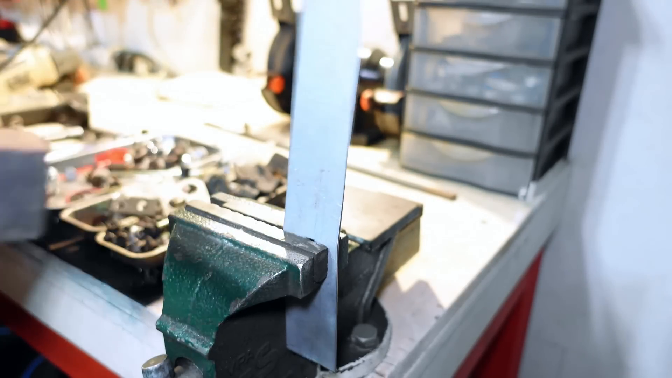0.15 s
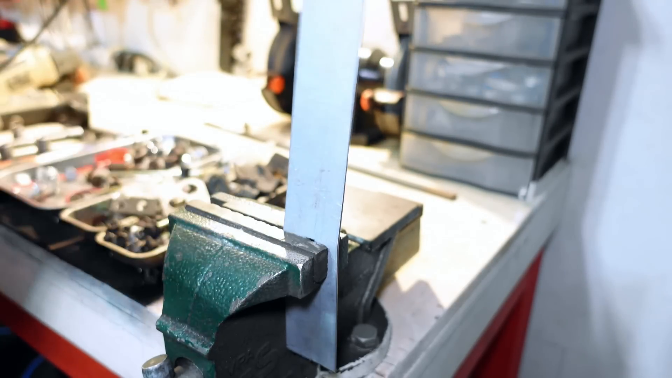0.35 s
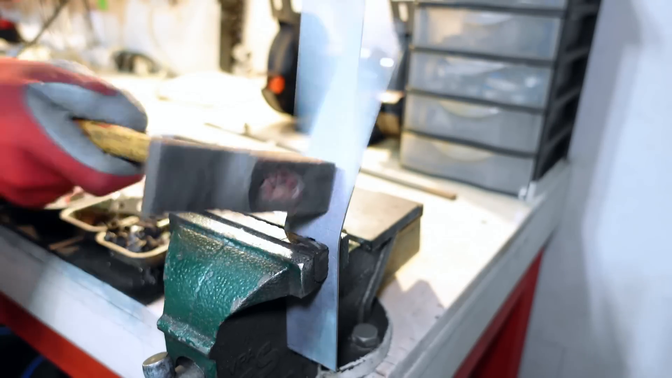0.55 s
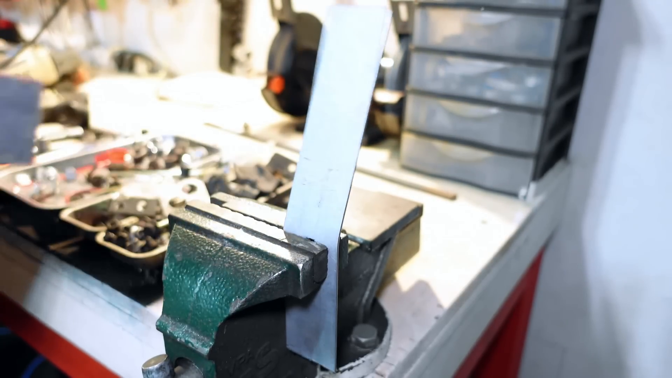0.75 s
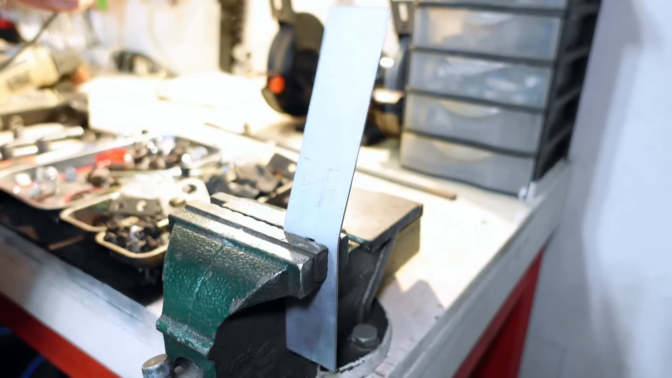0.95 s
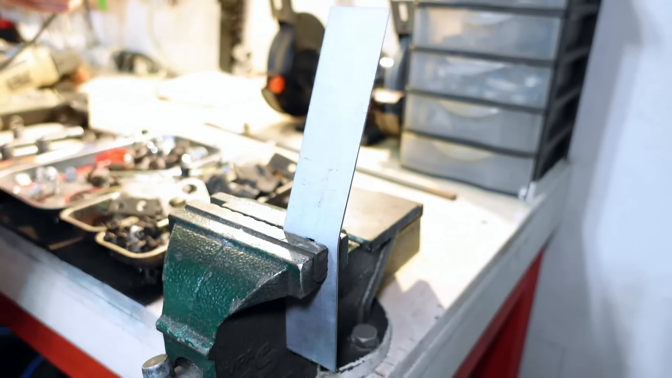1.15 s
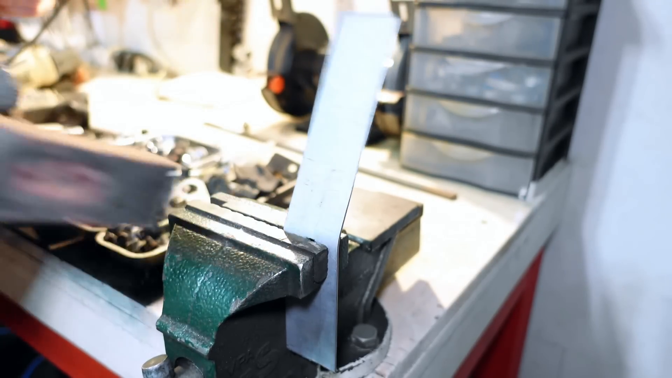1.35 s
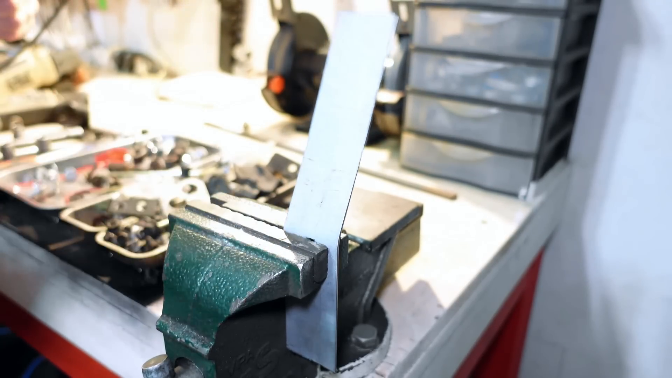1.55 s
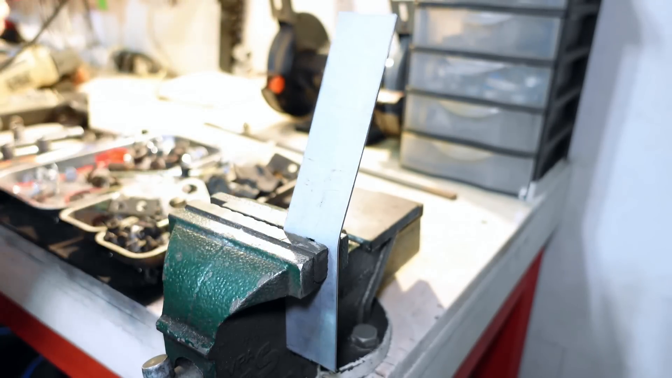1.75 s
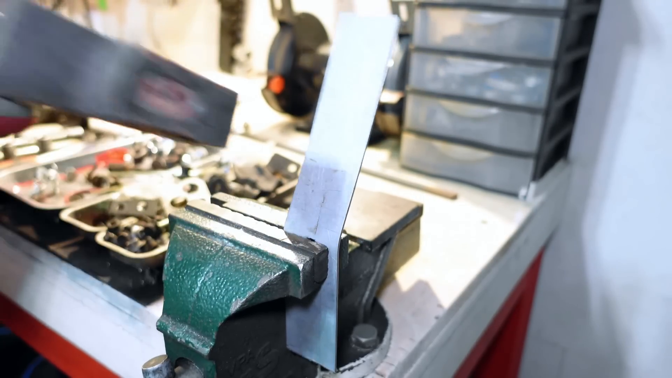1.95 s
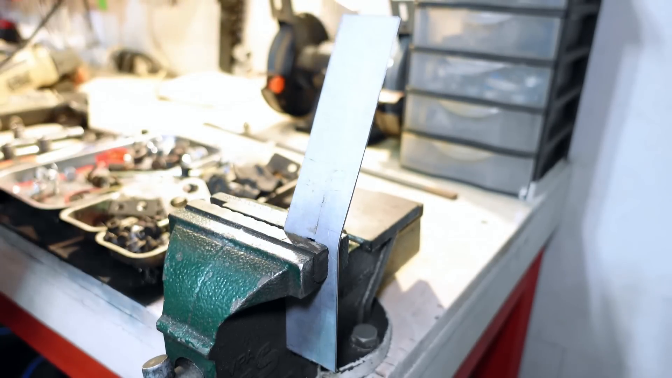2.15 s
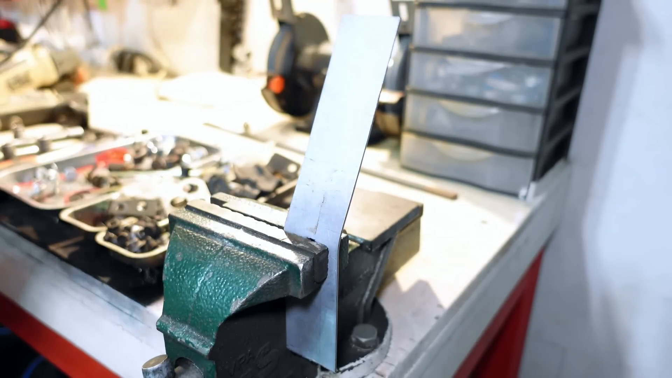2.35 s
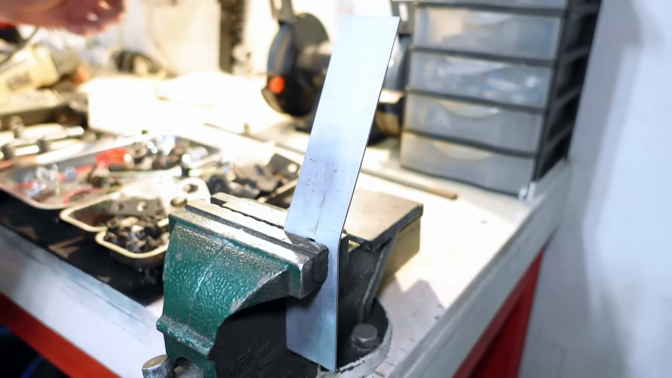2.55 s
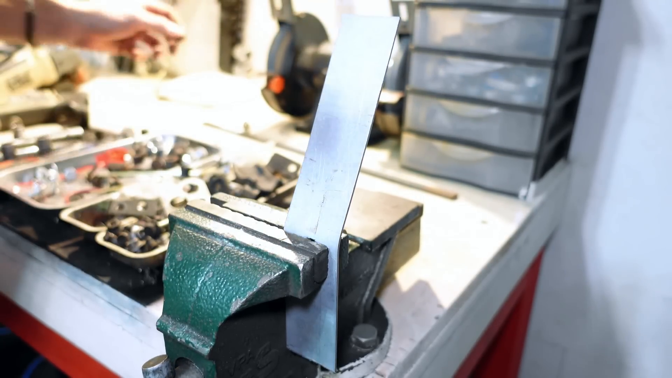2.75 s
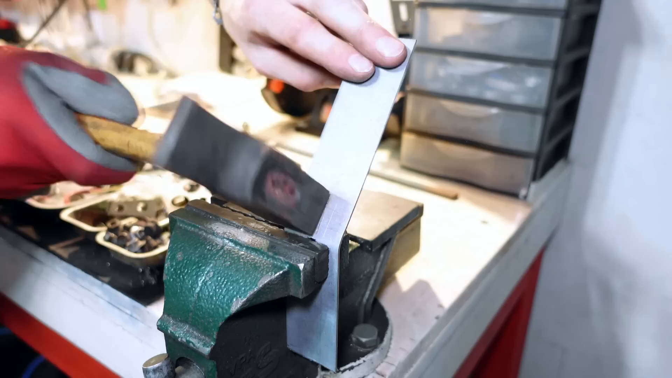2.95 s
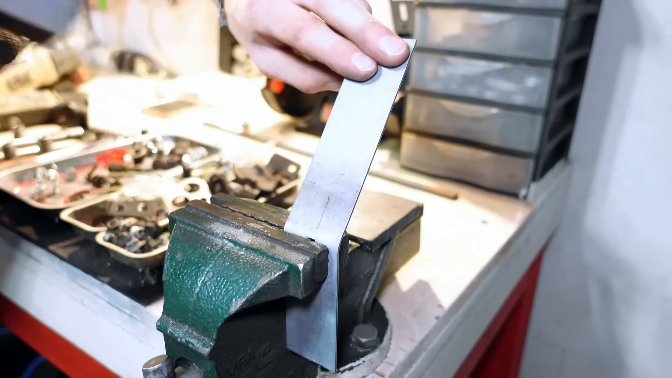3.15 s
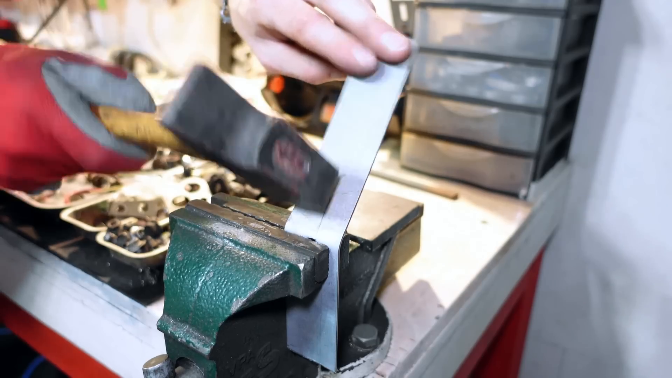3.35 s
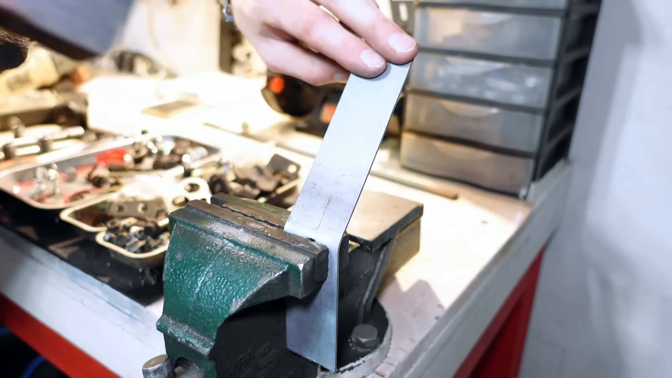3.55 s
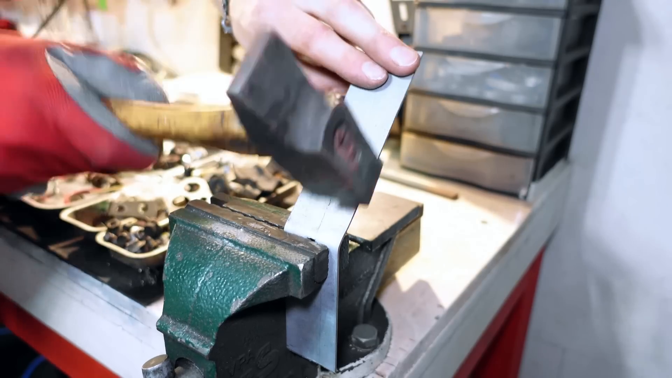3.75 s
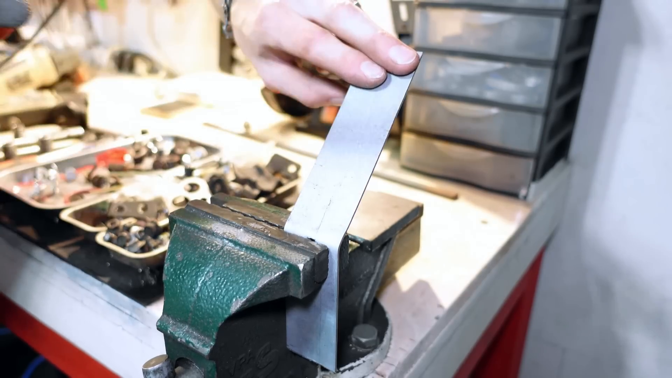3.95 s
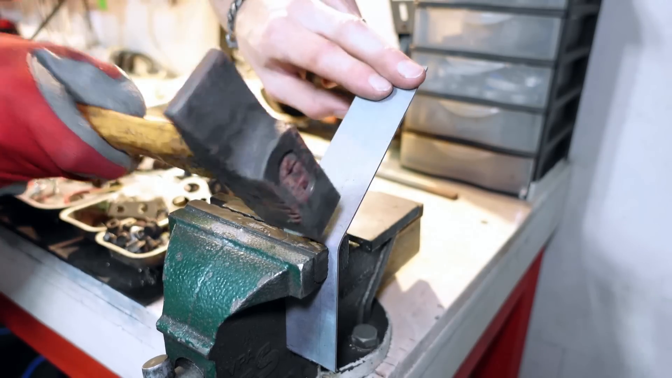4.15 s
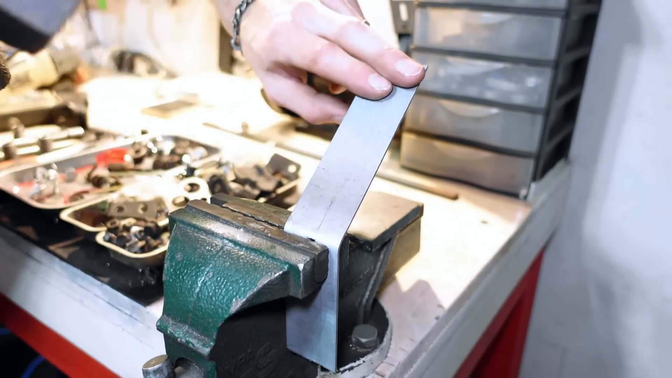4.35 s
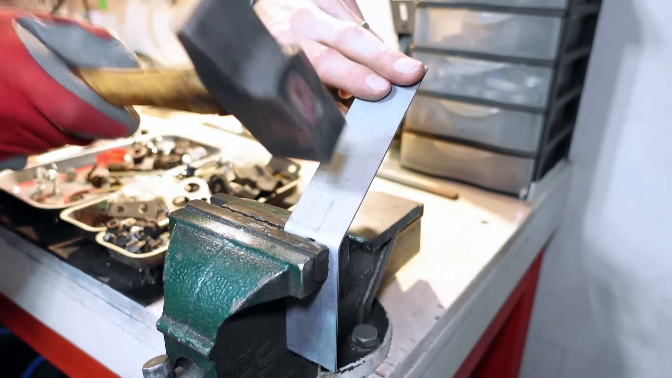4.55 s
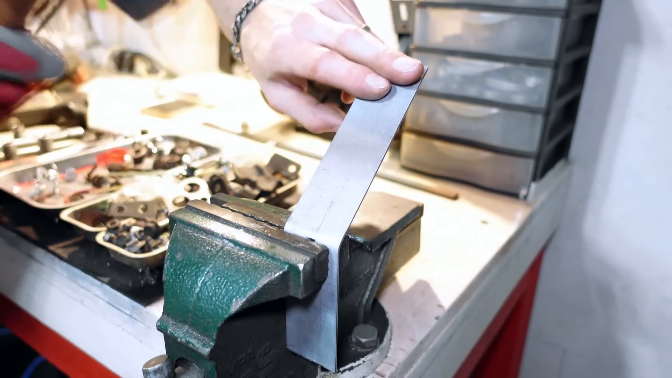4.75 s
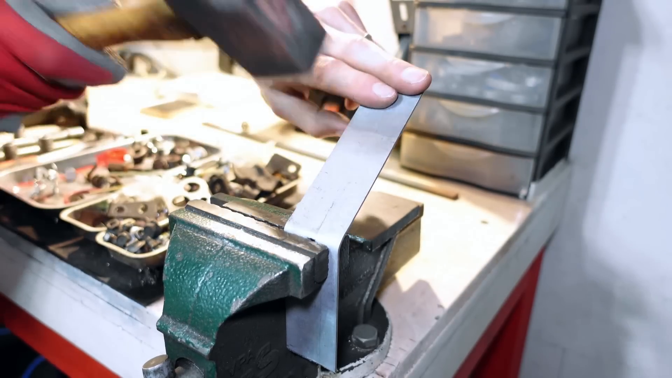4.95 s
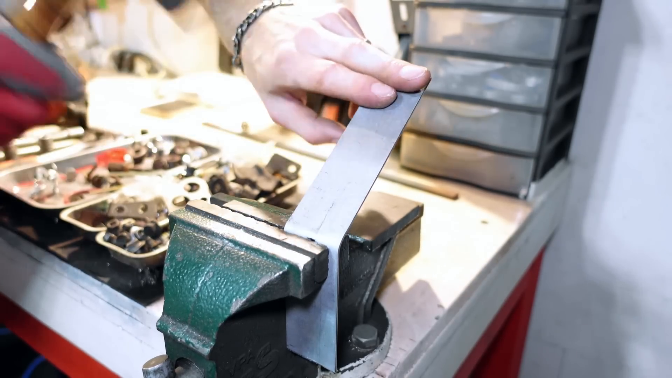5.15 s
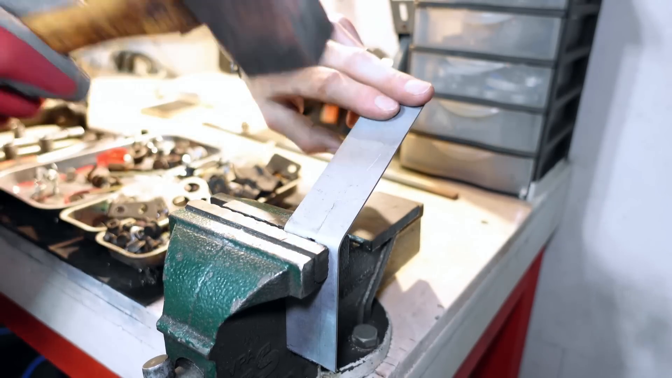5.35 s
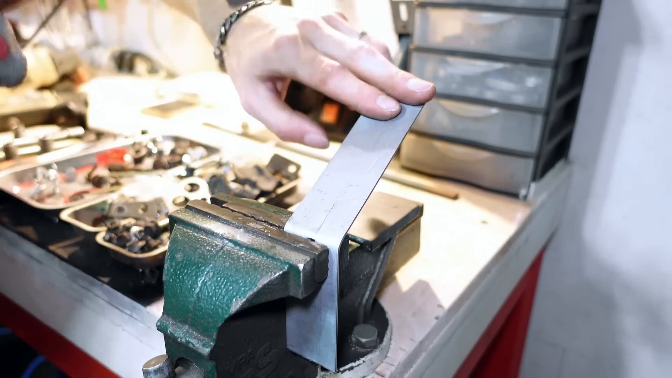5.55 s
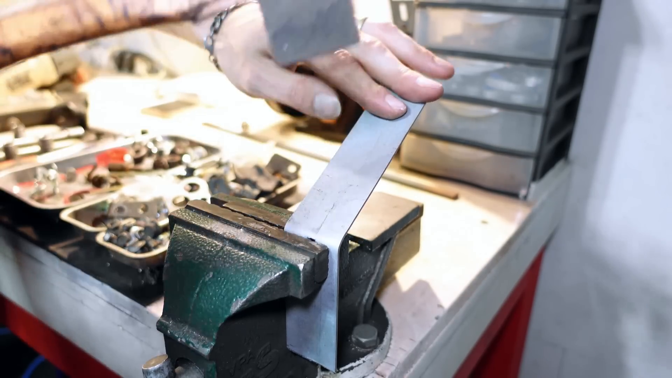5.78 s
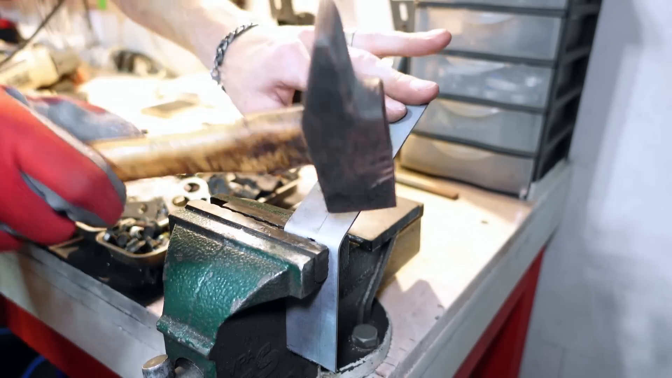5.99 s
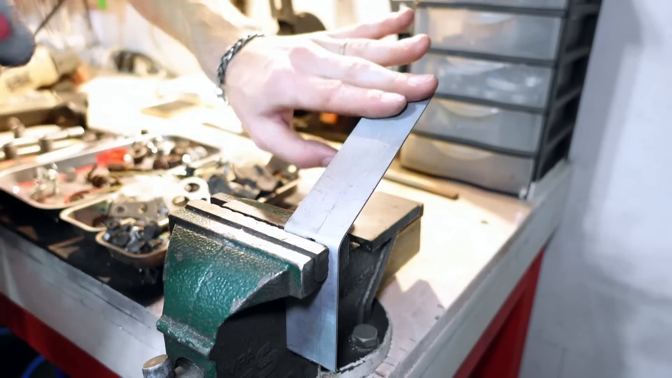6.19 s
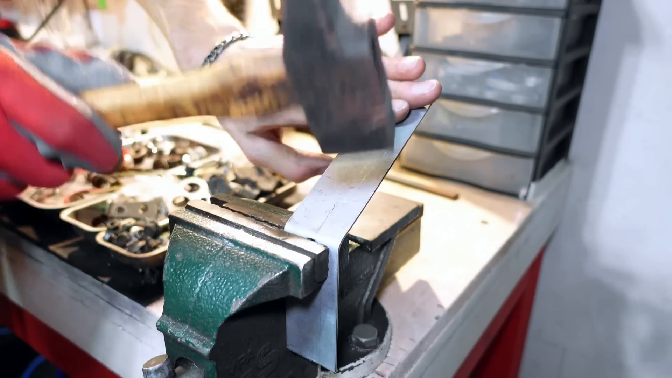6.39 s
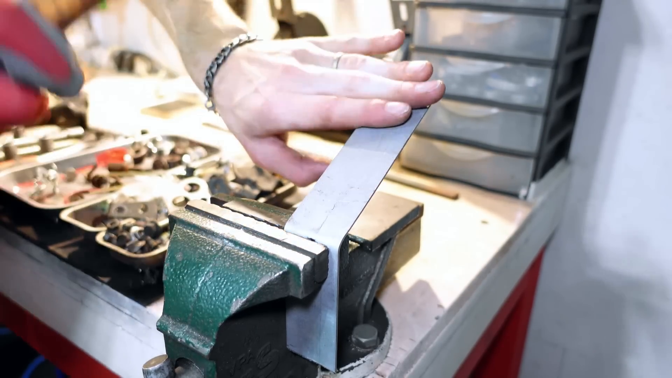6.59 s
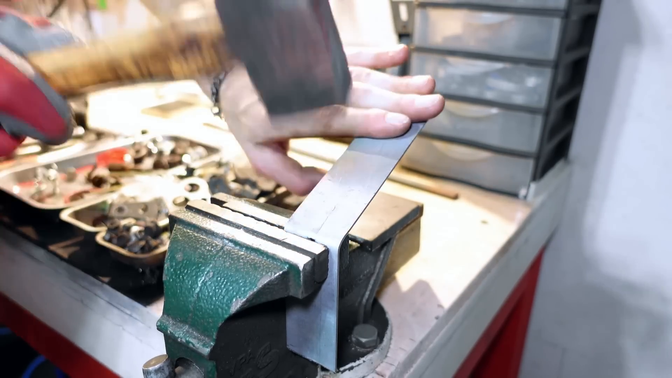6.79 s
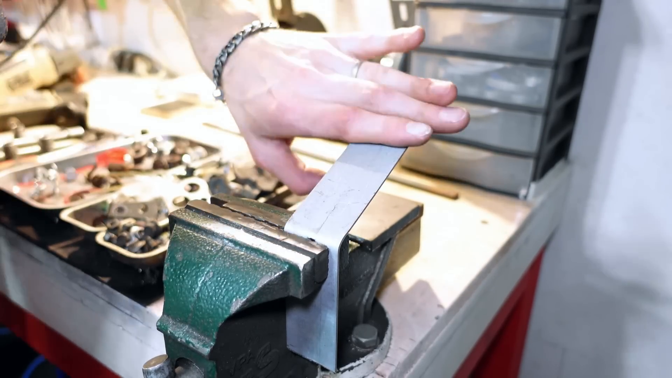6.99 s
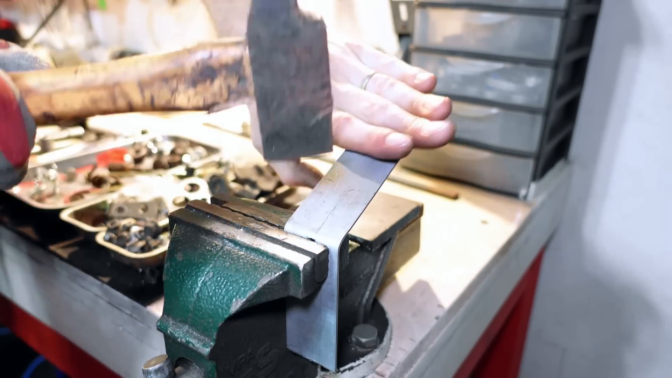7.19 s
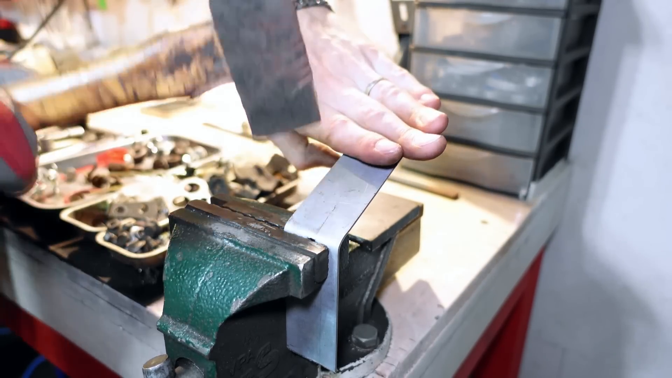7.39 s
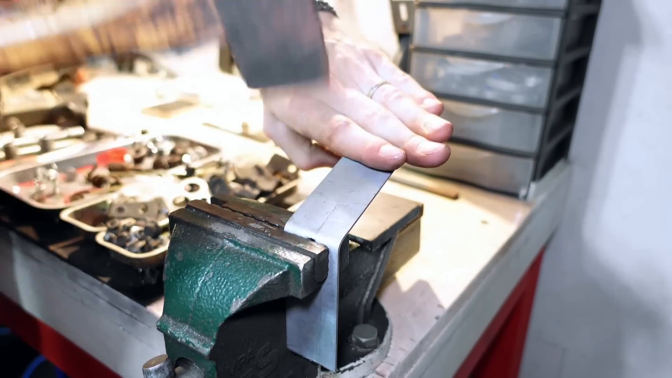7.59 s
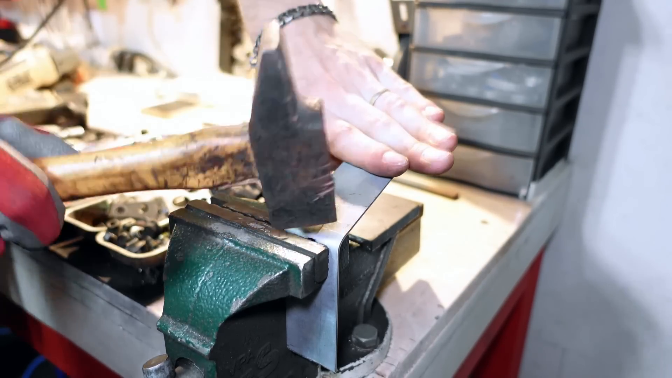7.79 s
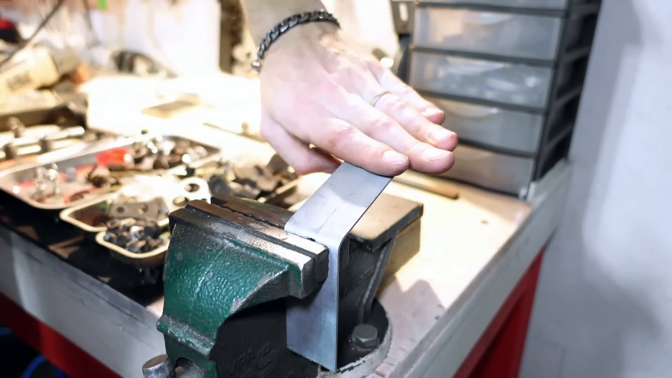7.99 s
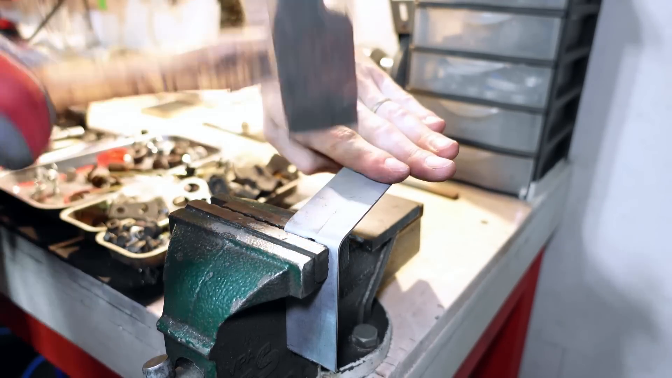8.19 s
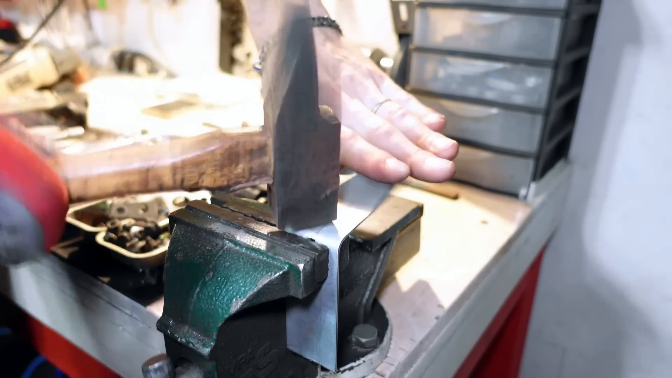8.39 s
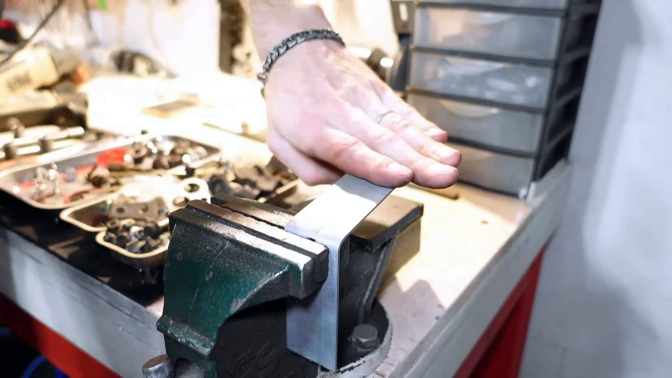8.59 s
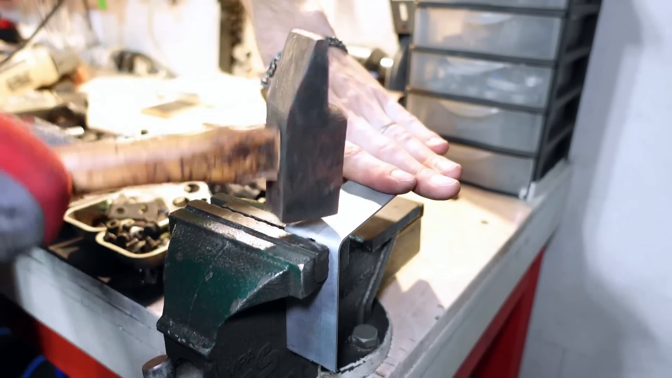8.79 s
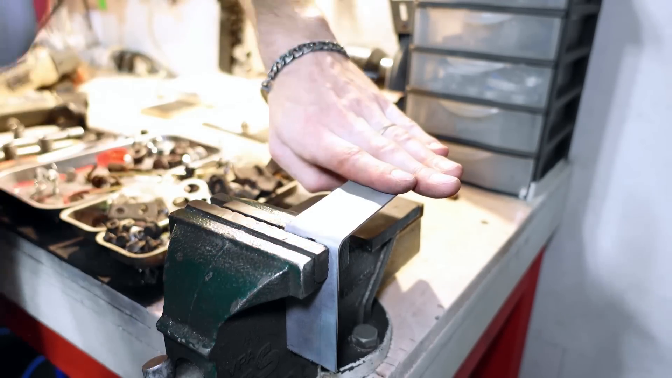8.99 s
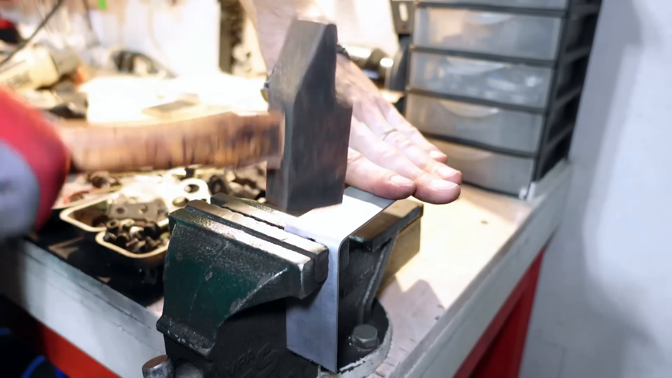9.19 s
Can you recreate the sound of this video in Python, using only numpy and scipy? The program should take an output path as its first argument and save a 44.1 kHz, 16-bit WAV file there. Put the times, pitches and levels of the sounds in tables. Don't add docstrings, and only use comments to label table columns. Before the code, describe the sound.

Close up in a small workshop, a hammer cracks against a steel bar in a vise. The first four spaced blows leave the free bar humming and buzzing against the jaws; after the fourth, small hard parts clatter down. A hand then grips the bar and about sixteen drier, clanking blows follow, with short room reverberation and level squashed at each hit.

```python
import sys
import numpy as np
from scipy import signal
from scipy.fft import rfft, irfft, next_fast_len
from scipy.io import wavfile
from scipy.ndimage import map_coordinates

SR = 44100
rng = np.random.default_rng(int(sys.argv[2]) if len(sys.argv) > 2 else 0)


def store_wav(level_fs):
    pcm = np.round(np.clip(np.atleast_2d(level_fs), -1, 1) * 32767)
    wavfile.write(sys.argv[1], SR, pcm.T.astype(np.int16))


def ratio_of_db(decibels):
    return 10 ** (np.asarray(decibels, float) / 20)


N = 407043

# start in seconds, crack peak in dB, blow strength in dB, push into the vise in dB,
# gain duck in dB, point of contact.
BLOWS = [(0.0781, -4.5, 3.5, -2.5, 27.5, "straight"), (0.6418, 1, 0.5, -2.5, 22.5, "glancing"),
         (1.3454, -7, 2.5, 3.5, 26.5, "free"), (1.9396, 9, 2, 7, 17, "free"),
         (3.0458, -0.1, 1, 11.5, -1.5, "bend"), (3.4331, -7.5, 0.5, 8.5, 17, "face"),
         (3.8184, 0.5, -0.5, 2, 18, "face"), (4.1954, 0, -0.2, 1, 19, "face"),
         (4.568, 3, 2.5, 5.5, 21, "bend"), (4.921, 5.5, 0.5, -2.5, 17.5, "face"),
         (5.2994, 3, 1, -8, 21.5, "rim"), (6.0512, -7.5, -6.5, -6.5, 18.5, "tip"),
         (6.4028, 1.5, -1.5, -0.5, 17, "high"), (6.7467, 2, 0, -1.5, 20, "edge"),
         (7.5403, -6, -5, -0.5, 19, "flat"), (7.8658, 3.5, -1.1, -1, 17, "flat"),
         (8.1778, 7, 0.5, -2, 19.5, "flat"), (8.487, 4.5, 1, -3.5, 20.5, "jaws"),
         (8.808, 3, 3.5, 6, 21.5, "jaws"), (9.1334, 3, 14, 6, 32, "jaws")]
# frequency in Hz, time to fall by 60 dB in seconds.
FADE = [(60, 1), (170, 0.51), (420, 0.6), (1100, 0.49), (3000, 0.47), (8000, 0.41), (16000, 0.31)]


def along(points, hz):
    f, v = np.transpose(points)
    return np.interp(np.log(hz + 1), np.log(f + 1), v)


def unit(x):
    return x / np.sqrt(np.mean(x ** 2) + 1e-20)


def filtered(x, response):
    n = x.shape[-1]
    m = next_fast_len(n + 8192)
    return irfft(rfft(x, m) * response(np.fft.rfftfreq(m, 1 / SR)), m)[..., :n]


def bump(hz, centre_hz, width_hz):
    return np.exp(-((hz - centre_hz) / width_hz) ** 2)


def resonances(peaks):
    def response(f):
        total = 0
        for k, (centre, width, db) in enumerate(peaks):
            damping = 1j * f * width
            total = total + (-1) ** k * ratio_of_db(db) * damping / (centre ** 2 - f ** 2 + damping)
        return total
    return response


def rush(n, colour_db, decays=False):
    # frequency in Hz, left-right likeness from 0 to 1.
    alike = [(60, 1), (180, 1), (550, 0.95), (1650, 0.94), (4970, 0.87), (9000, 0.76), (15000, .9)]
    # frequency in Hz, time constant in seconds.
    swell = [(100, 0.069), (300, 0.005), (1000, 0.00073), (5000, 0.0013)]
    hz, t, z = signal.stft(rng.standard_normal((2, n)), SR, nperseg=512, noverlap=384)
    turn = np.arccos(np.clip(along(alike, hz), 0, 1)) / 2
    gain = ratio_of_db(colour_db(hz))
    gain = gain / np.sqrt(np.mean(gain ** 2))
    z = z * (gain * [np.cos(turn), np.sin(turn)])[..., None]
    if decays:
        z = z * ratio_of_db(-60 * t / along(FADE, hz)[:, None])
        z = z * (1 - np.exp(-t / along(swell, hz)[:, None]))
    mid, side = signal.istft(z, SR, nperseg=512, noverlap=384)[1][:, :n]
    return np.array([mid + side, mid - side])


def ring(modes, t, lift_db):
    total = 0
    for hz, db, t60 in modes:
        luck_db, detune, phase = rng.standard_normal(3) * [2, 0.003, 3]
        level = ratio_of_db(db + lift_db(hz) + luck_db - 60 * t / t60)
        total = total + level * np.sin(2 * np.pi * hz * (1 + detune) * t + phase)
    return total


def room(x, speed):
    tail = rush(SR // 2, lambda hz: 0 * hz, decays=True) * ratio_of_db(-speed * np.arange(SR // 2) / SR)
    return signal.fftconvolve(x[None], tail / np.linalg.norm(tail[0]), axes=1)[:, :N]


def crack(crack_db, modes_db):
    # frequency in Hz, spectral density in dB per Hz.
    crack_colour = [(180, -23), (300, -5), (908, -12), (2000, -13), (5750, 0.5), (6790, -9.5),
                    (11100, -4.5), (14200, -15), (16500, -27)]
    burst = rush(1024, lambda hz: along(crack_colour, hz) + 0.25 * modes_db(hz))
    return burst * ratio_of_db(crack_db - 2.5 - 60 * np.arange(1024) / SR / 0.014)


def shaking(contact, vise_db, rings, modes_db, t):
    # frequency in Hz, spectral density in dB per Hz.
    body = [(18, -68.5), (30, -56.5), (124, -22.5), (189, 16.5), (239, -7.5), (486, -10), (988, -15),
            (1100, -20.5), (1280, -18.5), (1390, -24.5), (1500, -19), (2410, -22), (4650, -18.5),
            (10200, -22), (16000, -26.5)]
    # frequency in Hz, level in dB, t60 in seconds.
    bench_modes = [(168.9, -10.5, 0.67), (159.8, -21.5, 0.47), (200, -5, 0.52), (284.4, -15.5, 0.38),
                   (336, -17.5, 0.63), (447, -20, 0.34), (482.4, -9.5, 0.35), (645, -6, 0.12),
                   (853, -25, 0.51), (1090, -29.5, 0.34), (1400, -21, .4)]
    # frequency in Hz, level in dB, t60 in seconds.
    head_modes = [(1097, -31, .45), (5580, -29, .3)]
    contacts = {"straight": (-3, 1, 3.5, 4528, 3.5), "free": (-2.5, 2, 2.5, 4700.5, 4.5),
                "glancing": (-9, 5, 1.5, 4290, 11.5), "tip": (-3.5, 6, -1, 4636, 15),
                "bend": (-1.5, 1, -3, 4995.5, 3), "face": (0.2, 0.8, 0.67, 3900, 3.2),
                "rim": (-3.5, 0, 0, 3703, 11.5), "edge": (-3.5, 1.5, 4, 4203, 15),
                "high": (-1.2, 1, 3.5, 4805.5, 2), "flat": (-3, 2, 1, 4996, 6),
                "jaws": (-1, 4.5, 0, 5148, 7.5)}
    bench_db, jaw_db, treble_db, clang_hz, clang_db = contacts[contact]
    jaw_db = jaw_db + 0.38 * vise_db
    share = [(200, bench_db), (600, vise_db), (2000, jaw_db), (4500, 0.012), (9000, treble_db)]
    crowd = rng.standard_normal(120)

    def colour(hz):
        crowd_db = 3 * np.interp(hz / 140, np.arange(120), crowd) * (hz > 1500)
        clang = clang_db * bump(hz, clang_hz, 1010)
        return along(body, hz) + along(share, hz) + clang + modes_db(hz) + crowd_db

    shake = rush(len(t), colour, decays=True) * (1 - np.exp(-t / 0.0024))
    bench = ratio_of_db(bench_db) * ring(bench_modes, t, modes_db) * (1 - np.exp(-t / 0.02))
    head = ring(head_modes, t, modes_db)
    mean_db = 20 * np.log10(np.sqrt(np.mean(ratio_of_db(colour(np.arange(0, SR / 2, 86))) ** 2)))
    cores = [(hz, -26.5 - mean_db, 0.85 * along(FADE, hz)) for hz, _ in rings]
    return shake + bench + head + ring(cores, t, colour) * (1 - np.exp(-t / 0.004))


def blows():
    rings_free = {"straight": [(490, 7.5), (1300, 4), (1720, 12), (2800, 13.5), (4520, 4), (5430, 3.5),
                  (7580, 13)], "free": [(900, 1.5), (1040, 3.5), (1720, 4), (2710, 8.5), (4520, 8.5),
                  (5450, 6), (9090, -0.5), (14170, 1.5)], "glancing": [(150, 5), (900, 1.5), (2670, 9),
                  (5470, 10), (5770, 8.5), (10400, 10.5)]}
    rings_held = {"bend": [(670, 7.5), (820, 8), (1120, 8), (1420, 9.5), (7200, 9.5), (9040, 8.5),
                  (11110, 9.5), (13610, 2.5)], "tip": [(990, 18), (2890, 11), (5150, 1), (8660, 14),
                  (9470, 8)], "face": [(340, 1.5), (510, 3), (1100, 11), (4520, 9), (5430, 7.5),
                  (6680, 3.5), (8140, 2.5)], "rim": [(340, 1.5), (470, 7.5), (1080, 9), (3400, -1),
                  (3750, 0.5)], "edge": [(1890, -1.5), (3700, 6.5), (9820, 6), (12360, 11)],
                  "high": [(2950, 7), (4520, 11), (6200, 8.5), (8610, 6.5), (9950, -5)],
                  "flat": [(340, 3.5), (860, 5.5), (1420, 4), (4480, 5), (4780, -8), (5770, 4),
                  (9500, 6.5)], "jaws": [(340, 0), (650, 6), (1030, 4.5), (2200, 0), (2840, 6.5), (5430, 4),
                  (8610, 4), (9130, 3), (10420, 9.5)]}
    out, t = np.zeros((2, N + SR)), np.arange(int(0.75 * SR)) / SR
    for s, crack_db, db, vise_db, _, contact in BLOWS:
        rings = {**rings_free, **rings_held}[contact]

        def modes_db(hz):
            return sum(lift * bump(hz, centre, 50 + 0.017 * centre) for centre, lift in rings)

        i = round(s * SR)
        out[:, i:i + len(t)] += ratio_of_db(db) * shaking(contact, vise_db, rings, modes_db, t)
        out[:, i:i + 1024] += crack(crack_db, modes_db)
    return filtered(out[:, :N], lambda f: ratio_of_db(-5 * bump(f, 105, 25)))


def bar():
    # start in seconds, sway in dB, buzz in dB, buzz fall in dB per second,
    # time until the swing narrows in seconds.
    swings = [
        (-0.5, -54, -35.5, 50, 0.1),
        (0.0779, -29, -30, 33, 0.15),
        (0.6385, -32, -12.5, 80, 0.11),
        (1.3443, -33.5, -26.5, 7.5, 0.27),
        (1.939, -35.5, -9, 102.5, 0.18),
    ]
    # frequency in Hz, width in Hz, level in dB.
    straight = [(230, 60, 0.5), (487, 48, -7), (1266, 45, -1.5), (1843, 30, -5.5), (2620, 43, -3),
                (4470, 170, -14.5), (6400, 60, -12.5), (7600, 40, -19.5), (10800, 60, -24)]
    # frequency in Hz, width in Hz, level in dB.
    bent = [(226, 78, -6.5), (436, 29, 2.5), (900, 29, 4), (1150, 100, -5), (2720, 90, -14.5),
            (4420, 200, -34), (6740, 60, -25)]
    # frequency in Hz, width in Hz, level in dB.
    loose = [(448, 40, -9), (830, 8.8, 4), (896.4, 14, 10.5), (930, 6.1, 0), (1045, 31, 4),
             (1500, 550, -21.5), (2580, 46, -14), (2810, 65, -7.5), (4270, 35, -10), (4530, 83, -1),
             (6740, 59, -9.5), (7800, 19, -20), (9100, 68, -25.5), (6000, 9000, -30), (10700, 80, -24.5),
             (12640, 300, -28.5), (14240, 80, -21), (15200, 300, -27)]
    t = np.arange(N) / SR
    swing = np.searchsorted([row[0] for row in swings], t) - 1
    s, sway_db, buzz_db, buzz_fall, narrows = np.transpose(swings)[:, swing]
    since = t - s
    wide = np.exp(-(since / narrows) ** 10)
    hz = 75.4 + 0.43 * swing - 1.2 * since - 1.8 * wide
    turns = np.cumsum(hz) / SR
    grip = ratio_of_db(-499 * np.maximum(t - 3.03, 0))
    grows = (1 - np.exp(-(since / 0.1) ** 2)) * grip

    slaps = np.diff(np.floor(turns), prepend=0)
    slaps = slaps + 0.016 * rng.standard_normal(N)
    stage = np.searchsorted([blow[0] for blow in BLOWS[1:3]], t)
    voices = [unit(filtered(slaps, resonances(modes))) for modes in (straight, bent, loose)]
    buzz = grows * ratio_of_db(buzz_db - buzz_fall * since) * np.choose(stage, voices)

    waver = map_coordinates(rng.standard_normal(100), [t * 10.5])
    fall = ratio_of_db(-68 * since) + ratio_of_db(-23 - 12 * since)
    sway = grows * ratio_of_db(sway_db + 8 + 2.5 * waver) * fall * np.sin(2 * np.pi * turns)
    low = filtered(buzz, lambda f: 1 / (1 + 1j * f / 1300) ** 2)
    return sway + 0.4 * buzz + 0.8 * low + room(1.1 * buzz - 0.7 * low, speed=150)


def parts():
    # start in seconds, peak in dB, pitch in Hz, pitch level in dB, low knock in dB.
    landings = [(2.1309, -6.5, 1840, 5, -12), (2.137, -9.5, 2700, 7.5, -24), (2.178, -5.5, 707, 8, -28.5),
                (2.192, -4.5, 2730, 5.5, -26), (2.2225, -12, 3620, 8.5, -24.5), (2.232, -7, 1225, 12, -31),
                (2.243, -20, 1290, 15.5, -29), (2.296, -12.5, 1710, 11, -22), (2.306, -11.5, 1956, 6.5, -7),
                (2.325, -16.5, 3690, 12, -30), (2.337, -22, 2530, -8.5, -17.5), (2.342, -6, 1945, 10, -16),
                (2.351, -19.5, 2840, 12, -39.5), (2.399, -24.5, 1690, 11, -30.5),
                (2.4338, -17, 1570, 18.5, -3.5), (2.437, -9.5, 1620, 4, -3.5), (2.446, -21.5, 260, 21, -5),
                (2.473, -22, 600, 7.5, -3), (2.5235, -21, 1700, 6.5, -26), (2.5261, -11, 1690, 13.5, -5)]
    dry, t = np.zeros(N), np.arange(4096) / SR
    landing_s = 0.0023
    for s, db, hz, pitch_db, knock_db in landings:
        burst = rng.standard_normal(4096) * t / landing_s * np.exp(1 - t / landing_s)
        voice = resonances([(450, 500, knock_db + 15), (hz, 0.17 * hz, pitch_db),
                            (2800, 3000, -3), (6500, 6000, -8)])
        dry[round(s * SR):][:4096] += ratio_of_db(db + 4.5) * filtered(burst, voice)

    def above(edge_hz):
        return filtered(dry, lambda f: (1j * f / (edge_hz + 1j * f)) ** 2)

    return above(580) + ratio_of_db(-2) * room(above(120), speed=35)


def tool():
    # start in seconds, frequency in Hz, level in dB, t60 in seconds.
    tool_rings = [
        (0, 581, -53, .9),
        (0, 1795, -55, .9),
        (.641, 1895, -31, .7),
        (2.44, 1222, -53, 1.5),
        (3.82, 1222, -40, 1.2),
        (5.3, 1906, -36, .55),
        (6.747, 1906, -27, .6),
    ]
    out, t = np.zeros((2, N + SR)), np.arange(int(0.75 * SR)) / SR
    for s, *mode in tool_rings:
        out[:, round(s * SR):][:, :len(t)] += ring([mode], t, lift_db=np.zeros_like)
    return out[:, :N]


def touches():
    # start in seconds, level in dB, centre in Hz, width in Hz, length in seconds.
    contact_puffs = [
        (0.043, -47, 7040, 9800, 0.002),
        (3.035, -41, 200, 278, 0.0087),
        (5.788, -57.5, 700, 159.4, 0.024),
        (7.265, -54.5, 12000, 12000, 0.033),
        (7.506, -60, 8930, 6500, 0.0051),
    ]
    out, t = np.zeros(N), np.arange(8192) / SR
    for s, db, hz, width_hz, length in contact_puffs:
        puff = unit(filtered(rng.standard_normal(8192), resonances([(hz, width_hz, 0)])))
        out[round(s * SR):][:8192] += ratio_of_db(db + 16) * puff * t / length * np.exp(-2 * t / length)
    return out


def quiet_room():
    # frequency in Hz, spectral density in dB per Hz.
    floor_colour = [(18, -58.5), (30, -21), (266, 1), (1460, -16), (1670, -9.5), (2610, -16.5),
                    (3140, -12.5), (4080, -15), (4780, -15), (16000, -29.5)]
    return ratio_of_db(-63.5) * rush(N, lambda hz: along(floor_colour, hz))


def scene():
    return blows() + bar() + parts() + tool() + touches() + quiet_room()


def gain_control():
    ceiling_db, fall_db_per_s, recovery_db_per_s = -12, 130, 366
    attack_s, lead, lead_db = 0.0035, round(0.0087 * SR), 7
    cut, t = np.zeros(N + SR), np.arange(SR // 2) / SR
    for s, _, db, _, duck_db, _ in BLOWS:
        i = round(s * SR)
        over_ceiling = db - fall_db_per_s * t - ceiling_db
        held = np.maximum(duck_db - recovery_db_per_s * t, over_ceiling)
        cut[i - lead:i] = lead_db * np.minimum(1, np.arange(lead) / 200)
        cut[i:i + len(t)] = np.maximum(held, 0) * (1 - np.exp(-t / attack_s))
    return ratio_of_db(-cut[:N])


def band_limit(x):
    return signal.sosfilt(signal.butter(12, 16680, fs=SR, output="sos"), x)


def record(dry):
    x = filtered(dry, lambda f: (1j * f / (55 + 1j * f)) ** 2) * gain_control()
    x = x / (1 + np.abs(x) ** 8) ** (1 / 8)
    x = filtered(x, lambda hz: ratio_of_db(-40 * np.clip((hz - 15800) / 800, 0, 2.5)))
    return band_limit(x)


dry = scene()
out = record(dry)
store_wav(out)
```